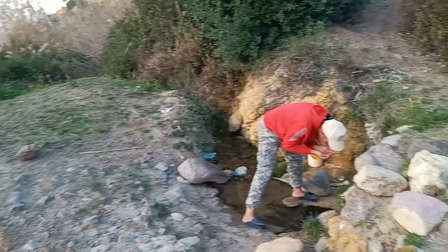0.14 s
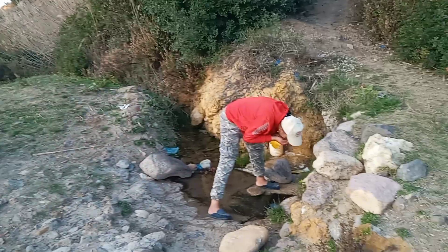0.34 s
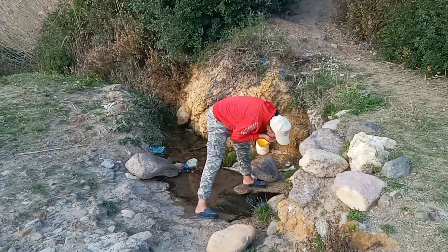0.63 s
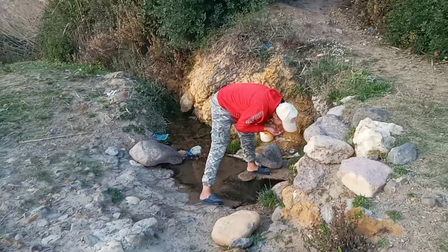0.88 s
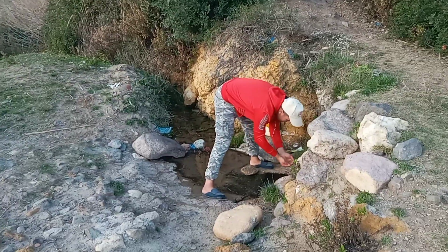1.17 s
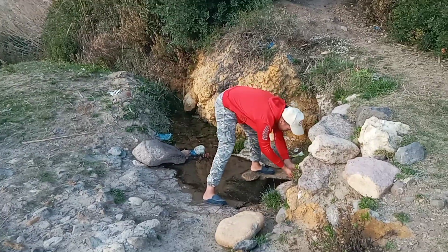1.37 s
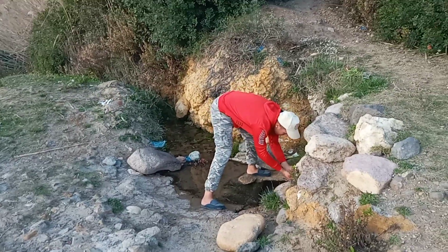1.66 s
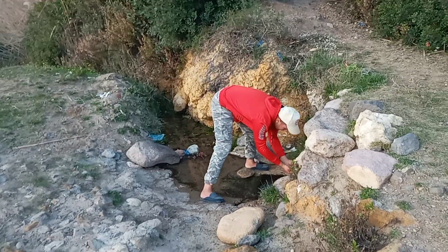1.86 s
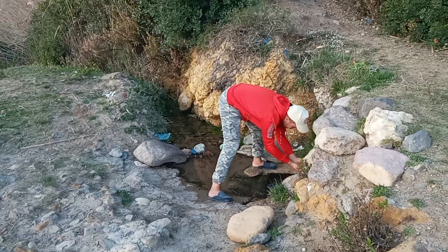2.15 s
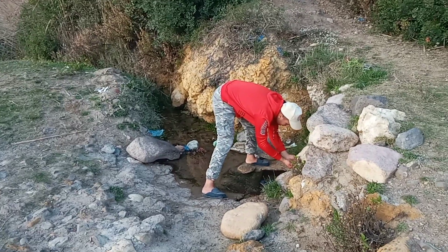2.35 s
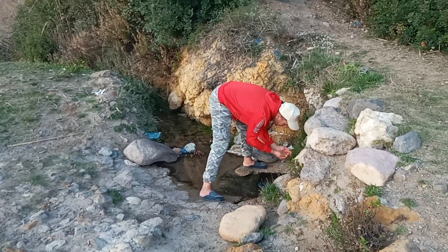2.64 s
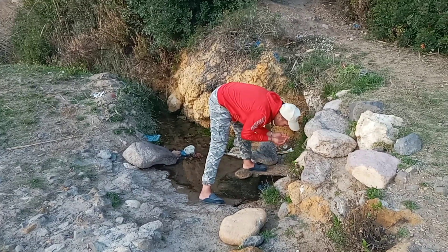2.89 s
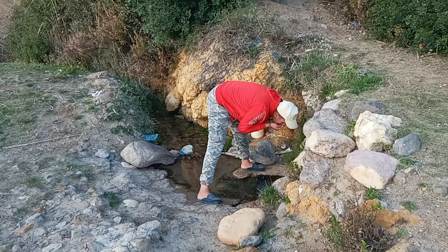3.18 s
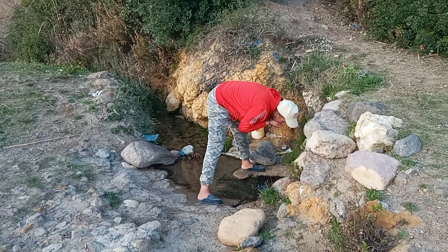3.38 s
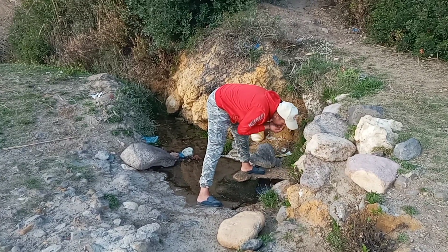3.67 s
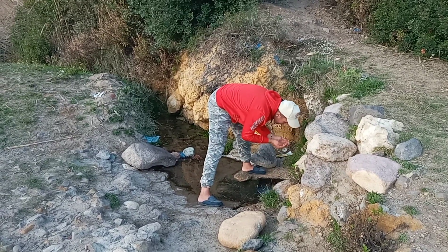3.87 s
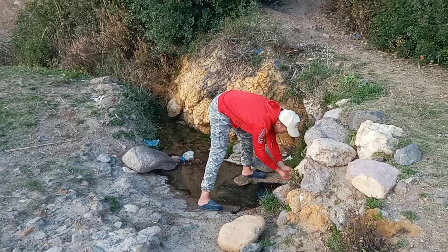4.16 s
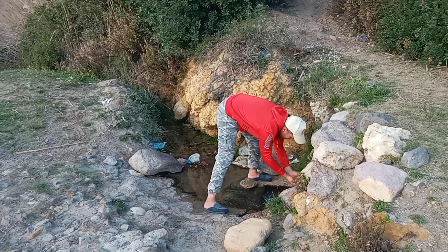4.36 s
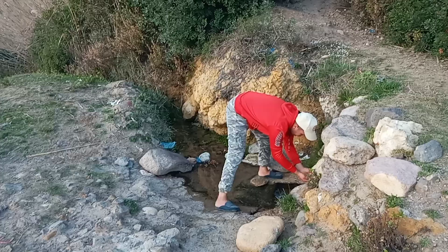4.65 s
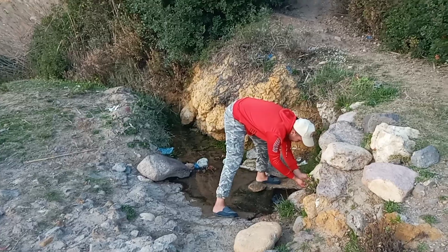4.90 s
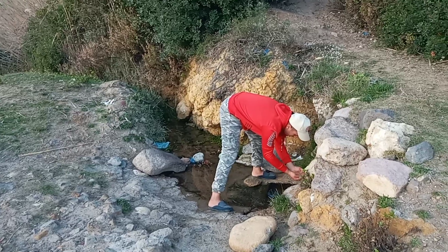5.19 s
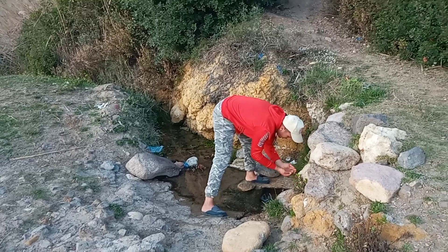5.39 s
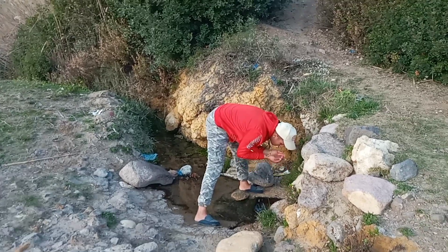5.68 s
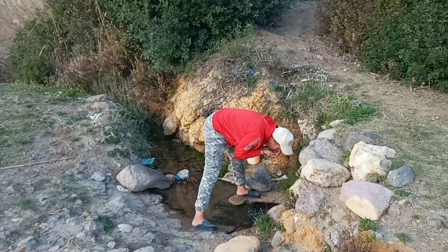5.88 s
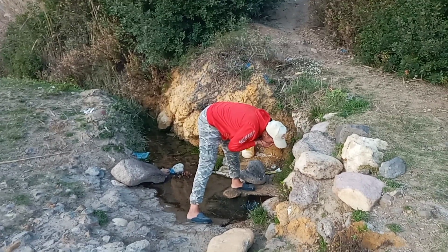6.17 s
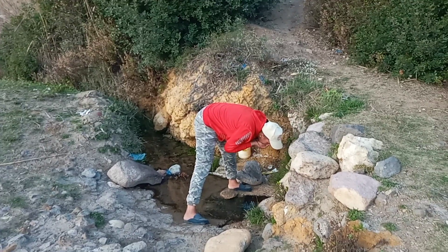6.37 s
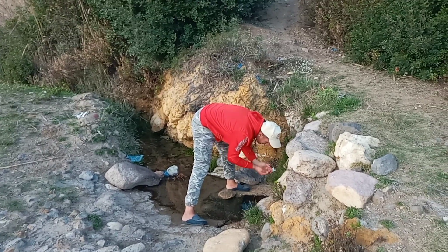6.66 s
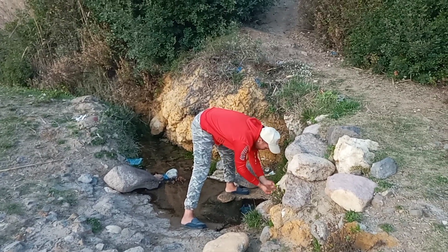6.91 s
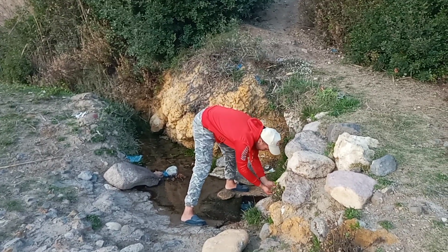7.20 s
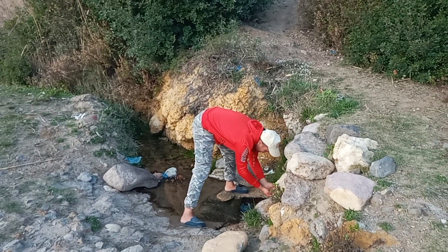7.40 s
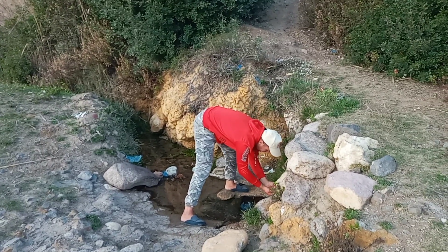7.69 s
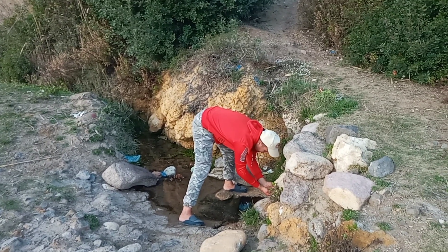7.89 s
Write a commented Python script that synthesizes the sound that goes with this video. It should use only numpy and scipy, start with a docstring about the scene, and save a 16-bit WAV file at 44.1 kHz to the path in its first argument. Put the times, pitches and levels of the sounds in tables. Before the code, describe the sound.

Someone scoops water by hand from a small spring pool among rocks. A fine trickle swells and thins with each handful, dotted with crisp drops, tiny bubble plinks and short gurgles. A sudden gulping plunge comes early, then water pours back in the middle and later. The microphone is close, with dull bumps mostly on the right, in still outdoor air.

```python
"""A small spring pool in a rocky hollow: someone scoops water and lets it run back through the hands.
Drops smack as short bursts of banded noise; bubbles ring as decaying sines, alone, in runs and in swarms.
The swarms make a fine trickle that swells with each handful; plunges and sheets are shaped noise.
Fingers bump and brush the hand-held microphone as damped swings and soft noise; the air is very still."""
import sys
import numpy as np
from scipy import signal
from scipy.fft import rfft, irfft
from scipy.io import wavfile
from scipy.ndimage import uniform_filter1d

SR = 44100
rng = np.random.default_rng(int(sys.argv[2]) if len(sys.argv) > 2 else 0)


def store_pcm(level_fs):
    """Save levels as 16-bit WAV."""
    pcm = np.round(np.clip(level_fs, -1, 1) * 32767).astype(np.int16)
    wavfile.write(sys.argv[1], SR, np.atleast_2d(pcm).T)


N = 354563
TIME = np.arange(N) / SR
CUTOFF_HZ = 15900  # top of the audible band here


def from_db(db):
    """Decibels to amplitude gain."""
    return 10 ** (np.asarray(db) / 20)


def rms_one(x):
    """Scale to unit power."""
    return x / np.sqrt(np.mean(x ** 2) + 1e-20)


def add(track, s, sound):
    """Mix a short sound in at time s."""
    at = max(int(s * SR), 0)
    track[at:at + len(sound)] += sound[:max(N - at, 0)]


def band(x, low_hz, high_hz, order=2):
    """Butterworth band-pass, kept at least a little wide and below the Nyquist limit."""
    high_hz = min(max(high_hz, 1.1 * low_hz), .45 * SR)
    return signal.sosfilt(signal.butter(order, [low_hz, high_hz], "band", fs=SR, output="sos"), x)


def colour(x, points, size=2048):
    """Causal (minimum-phase) filter through (f/Hz, level/dB) points."""
    hz, db = np.transpose(points)
    grid = np.maximum(np.fft.rfftfreq(size, 1 / SR), 1)
    curve_db = np.interp(np.log(grid), np.log(hz), db)
    cepstrum = irfft(np.log(from_db(curve_db)))
    # folding the cepstrum forward gives minimum phase
    cepstrum[1:size // 2] *= 2
    cepstrum[size // 2 + 1:] = 0
    return signal.oaconvolve(x, irfft(np.exp(rfft(cepstrum))))[:N]


def swells(rows, rise_s, fall_s):
    """Gain of overlapping (start, length, level) gestures: each rises, holds and dies away."""
    power = 0
    for s, length, db in rows:
        rise = np.clip((TIME - s) / rise_s, 0, 1)
        fall = np.exp(-np.clip((TIME - s - length) / fall_s, 0, 20))
        power = power + (from_db(db) * rise * fall) ** 2
    return np.sqrt(power)


# the loudest drops: t/s, relative level/dB, centre f/Hz, width/octaves, decay/ms (0.2 at least),
# snap level/dB against the body
SPLASHES = [(0.283, -43, 8000, 0.17, 1.9, -30), (0.59, -38.5, 7100, 0.43, 0.11, -19),
            (0.913, -46.5, 1450, 0.67, 3.1, -23), (0.915, -50.5, 440, 1.1, 2.4, -30),
            (1.043, -39, 5100, 0.69, 3.1, -24), (1.151, -31, 6350, 0.29, 0.56, -13),
            (1.215, -45.5, 5600, 0.86, 4.4, -22), (1.584, -47.5, 2600, 0.23, 7.1, -11),
            (2.226, -46, 5900, 0.14, 1.3, -17), (2.342, -45.5, 7530, 0.24, 3.1, -26),
            (2.355, -42, 6600, 0.27, 1.7, -31), (2.515, -33, 3640, 0.15, 1.9, -39),
            (2.58, -34.5, 3740, 0.83, 2, -14.5), (2.652, -38.5, 6850, 0.27, 2.3, -29),
            (2.704, -47.5, 3600, 0.18, 2.9, -14), (2.782, -40, 6920, 0.24, 2, -25),
            (3.059, -42, 2470, 0.91, 6.1, -31), (3.159, -38.5, 7140, 0.23, 2.1, -29),
            (3.475, -38.5, 6530, 0.4, 1.1, -27), (3.637, -47, 2800, 2.3, 4.7, -32),
            (3.729, -38, 5450, 0.53, 0.76, -37), (3.754, -45, 5100, 0.53, 3.1, -24),
            (3.784, -40.5, 5740, 0.52, 2.2, -41), (4.129, -40, 2870, 1.1, 4.3, -46),
            (4.2261, -43, 4300, 2.7, 0.9, -16), (4.382, -45.5, 7430, 0.14, 4.1, -43),
            (4.792, -48.5, 557, 4.2, 0.86, -20), (5.028, -40, 4250, 0.42, 3.4, -31),
            (5.123, -45, 3760, 0.11, 2.8, -29), (5.27, -38, 4750, 0.82, 4.3, -23),
            (5.324, -40, 5060, 0.52, 4.3, -25), (5.419, -43, 3900, 0.93, 9.7, -20),
            (5.477, -45, 3700, .9, 9.7, -26), (5.549, -48, 5300, 0.33, 2.9, -11.5),
            (5.683, -37.5, 2540, 0.12, 0.9, -7), (5.7043, -28, 5650, 0.93, 0.62, -18),
            (5.721, -42.5, 5430, 1.5, 3.1, -3), (5.79, -41.5, 3970, .3, 1.6, -22),
            (5.933, -38, 7100, 0.47, 1, -29), (6.018, -43, 6040, 0.57, 2.2, -37),
            (6.062, -36, 6600, 0.41, 1.3, -14), (6.21, -42.5, 6370, 0.35, 6.9, -35),
            (6.334, -42, 7150, 0.1, 13, -32), (6.358, -44.5, 3600, 0.96, 7.5, -30),
            (6.367, -38, 7200, 0.24, 0.26, -15), (6.437, -42, 6850, 0.093, 5.4, -38),
            (6.472, -40.5, 6850, 0.18, 1.3, -21), (6.778, -46, 7430, 0.27, 3.6, -20),
            (6.869, -42, 3580, 0.12, 5.4, -39), (7.029, -49, 4040, 1, 7.1, -27),
            (7.863, -34.5, 5300, 0.72, 2.6, -31), (7.948, -47, 1930, 1.5, 10.6, -28)]


def splashes(level_db, spatter_db, spatter_s, softness, sloppy_db):
    """Each drop cracks, slower slops more softly; droplets spatter, sloppy_db more per doubled decay."""
    out, t = np.zeros(N), TIME[:SR // 10]
    for s, db, hz, octaves, decay_ms, snap_db in SPLASHES:
        noise, grains, sizes = rng.standard_normal((3, len(t)))
        decay = max(decay_ms, .2) / 1000
        attack = softness * decay
        low_hz, high_hz = hz / 2 ** (octaves / 2), hz * 2 ** (octaves / 2)
        onset = np.minimum(t / attack, 1) ** 2
        crack = noise * onset * np.exp(-np.maximum(t - attack, 0) / decay)
        spatter = grains * from_db(0.47 * sizes) * onset * np.exp(-t / spatter_s)
        thrown = from_db(spatter_db + sloppy_db * np.log2(decay / spatter_s))
        body = rms_one(band(crack, low_hz, high_hz))
        body = body + thrown * rms_one(band(spatter, low_hz / 1.09, high_hz * 0.85))
        # a flat impact adds a wide-band snap
        snap = from_db(snap_db) * rms_one(band(crack + spatter / 10, 3100, CUTOFF_HZ))
        add(out, s - attack / 2, from_db(db + level_db) * (body + snap))
    return out


def bubble(hz, t60, rise):
    """A trapped bubble rings down; positive rise is the fraction it climbs as it nears the surface."""
    t = TIME[:int(t60 * SR) + 2]
    tone = np.sin(2 * np.pi * hz * (t + rise * t * t / (2 * t60)))
    return tone * from_db(-60 * t / t60) * (1 - np.exp(-t * hz))


# the loudest single bubbles: t/s, f/Hz, relative level/dB
BUBBLES = [(0.062, 1144, -58), (0.069, 3770, -60), (0.267, 2820, -61.5), (0.46, 2833, -58),
           (0.784, 2480, -63), (1.605, 2780, -62), (2.49, 1390, -58.5), (2.514, 6880, -54),
           (2.895, 6970, -68), (3.003, 7080, -61), (3.121, 1463, -59.5), (3.2, 1560, -55),
           (3.326, 4290, -59), (3.408, 3480, -57), (3.412, 6000, -52), (3.494, 2000, -54.5),
           (3.545, 3730, -62.5), (3.716, 7720, -52.5), (3.82, 7360, -57.5), (4.044, 7280, -61),
           (4.131, 2530, -58.5), (4.809, 430, -57), (5.436, 2310, -54), (5.578, 530, -63),
           (5.785, 1620, -56), (6.227, 1760, -52), (6.445, 7500, -61.5), (6.541, 1360, -57),
           (6.628, 6730, -60), (6.777, 247, -52.5), (6.825, 1024, -58.5), (6.836, 7400, -61.5),
           (6.952, 1800, -55.5), (6.96, 610, -62), (7.042, 650, -60), (7.057, 137, -49.5),
           (7.187, 1450, -61), (7.195, 2250, -63), (7.955, 1214, -53.5)]


def bubbles(level_db, t60, rise, trail_s, detune, trail_db, count=5):
    """A plink, then a trail of weaker bubbles of about its size that break off it."""
    out = np.zeros(N)
    for s, hz, db in BUBBLES:
        gain = from_db(db + level_db)
        add(out, s, gain * bubble(hz, t60, rise))
        for late, off in rng.random((count, 2)):
            weaker = gain * from_db(trail_db) * (1 - late / 2)
            near_hz = hz * (1 + detune * (2 * off - 1))
            add(out, s + trail_s * late, weaker * bubble(near_hz, t60, rise))
    return out


# air churned under the surface escapes in runs of bubbles: t/s, length/s, middle f/Hz, relative level/dB
GURGLES = [(1.03, 0.13, 1190, -58.5), (2.757, 0.086, 1474, -57.5), (3.504, 0.05, 1660, -65),
           (3.6, 0.06, 890, -60), (3.662, 0.06, 1730, -59), (6.205, 0.061, 953, -58),
           (6.797, 0.11, 1514, -59.5), (7.923, 0.044, 1490, -56.5)]


def gurgles(level_db, spread_octaves, t60, rise, count=16):
    """Overlapping bubbles crowd around one pitch, strongest in the middle of the run."""
    out = np.zeros(N)
    for s, length, hz, db in GURGLES:
        run = np.zeros(int((length + 2 * t60) * SR))
        for when, off in zip(rng.random(count), rng.standard_normal(count)):
            near_hz = hz * 2 ** (spread_octaves * off)
            add(run, when * length, np.sin(np.pi * when) * bubble(near_hz, t60, rise))
        add(out, s, from_db(db + level_db) * rms_one(pockets(run)))
    return out


# air squeezed through the water gurgles in thin glides:
# t/s, length/s, first f/Hz, last f/Hz, relative level/dB
CHIRPS = [(2.032, 0.041, 1326, 1820, -52), (2.057, 0.067, 3387, 3630, -56.5),
          (4.455, 0.052, 976, 720, -57.5), (5.837, 0.083, 6540, 7500, -51.5),
          (6.086, 0.11, 4950, 4720, -59), (6.134, 0.023, 3980, 3090, -54.5),
          (6.136, 0.026, 7130, 7430, -51), (6.199, 0.0274, 3990, 3250, -49.5),
          (6.652, 0.023, 3300, 3800, -53), (7.802, 0.031, 840, 1010, -52), (7.858, 0.048, 1044, 1134, -57)]


def chirps(level_db, waver):
    """Short gliding whistles, their pitch slightly unsteady."""
    out = np.zeros(N)
    for s, length, first_hz, last_hz, db in CHIRPS:
        n = int(length * SR)
        unsteady = rms_one(uniform_filter1d(rng.standard_normal(SR // 4), size=100))[:n]
        hz = np.linspace(first_hz, last_hz, n) * (1 + waver * unsteady)
        swell = np.sin(np.linspace(0, np.pi, n))
        whistle = np.sin(2 * np.pi * np.cumsum(hz) / SR)
        add(out, s, from_db(db + level_db) * swell * whistle)
    return out


# bubble sizes in running water, coarse to fine:
# lowest f/Hz, highest f/Hz, drops per second, cycles of ringing, trim level/dB
SIZES = [(218.7, 966, 90, 17, -10), (913, 4240, 760, 68, 2), (4410, 13000, 650, 120, 5.5)]
# colour of running water among the rocks: f/Hz, level/dB
WATER = [(170, 7), (270, 0), (400, -7.5), (620, -17.5), (780, -15), (1100, -4.5), (1500, 2), (2900, 0),
         (3700, 3.5), (4400, -5), (7600, 4), (9500, -19), (13000, -36.5), (15300, -5)]
GRAIN_SPREAD_DB, WASH_DB = 5.4, -11.5  # spread of drop strengths, wash against the bubbles


def running_water(rise, even_s, cluster_s, detune, count=4):
    """Each drop traps a cluster of like-sized bubbles; clusters and a soft wash swell with the flow."""
    out = 0
    for fineness, (low_hz, high_hz, per_s, cycles, trim_db) in enumerate(SIZES, -1):
        swarm = np.zeros(N)
        for when, size, strength, *members in rng.random((int(per_s * N / SR), 3 + 2 * count)):
            centre_hz = low_hz + (high_hz - low_hz) * size
            gain = from_db(GRAIN_SPREAD_DB * min(-np.log(1 - strength), 3.5)) * np.sqrt(centre_hz)
            for late, off in zip(members[:count], members[count:]):
                hz = centre_hz * (1 + detune * (2 * off - 1))
                # early members climb in pitch, the latest sink
                ring = bubble(hz, cycles / hz, rise * (1 - 2 * late ** 2))
                add(swarm, when * N / SR + cluster_s * late ** 2, gain * (1 - late / 2) * ring)
        wash = rms_one(band(rng.standard_normal(N), low_hz, high_hz, order=4))
        water = pockets(rms_one(swarm) + from_db(WASH_DB) * wash)
        water = hollow(colour(water, WATER), wet_db=-1, t60=0.12)
        # level out the chance swells, so that the flow sets the loudness
        power = uniform_filter1d(np.mean(water ** 2, axis=0), int(even_s * SR))
        water /= np.sqrt(power + 1e-12)
        # the finer the water, the more of it arrives in spurts
        share = (fineness + 2) / 4
        bursts = 1 - share + share * spurts()
        out = out + water * bursts * flow(fineness) * from_db(trim_db)
    return out


# water running off the hands, rising with each lifted handful: t/s, relative level/dB
RUNOFF = [(0, -61), (0.35, -66.5), (0.85, -61.5), (1.25, -57), (1.5, -68), (2.0, -74.5), (2.5, -64.5),
          (3.1, -62.5), (3.7, -55), (4.15, -63.5), (4.65, -71.5), (5.2, -69), (5.6, -61.5), (5.9, -58),
          (6.85, -76.5), (7.2, -95), (7.7, -71.5), (8.04, -60.5)]
# the hands stir or spill water: t/s, length/s, relative level/dB,
# brightness/dB from each bubble size to the next finer
SLOSHES = [(0.527, 0.25, -68.5, -11), (0.94, 0.23, -62, -7.5), (1.557, 0.053, -55.5, -2.5),
           (2.021, 0.21, -64.5, -12.5), (2.373, 0.037, -62.5, 3.5), (2.478, 0.16, -53.5, 1.5),
           (3.447, 0.03, -55.5, 6), (3.685, 0.033, -53, -2.5), (5.251, 0.28, -56, -0.5),
           (5.531, 0.038, -62.5, -16.5), (5.723, 0.13, -52.5, -4.5), (5.823, 0.404, -59.5, 5),
           (6.185, 0.091, -65, -14.5), (6.323, 0.22, -61, 2.5), (6.54, 0.19, -61.5, -7),
           (6.737, 0.17, -60, -7.5), (7.91, 0.035, -59, -14)]


def flow(fineness):
    """Gain of one bubble size (-1 gurgle, 0 trickle, 1 spray): runoff and sloshes added in power."""
    rows = [(s, length, db + bright * fineness) for s, length, db, bright in SLOSHES]
    sloshes = swells(rows, rise_s=0.01, fall_s=0.036)
    runoff = from_db(np.interp(TIME, *np.transpose(RUNOFF)))
    return np.hypot(runoff, sloshes)


SPURTS_PER_S, SPURT_DECAY_S = 40, .014


def spurts():
    """Gain of water that arrives in random bursts: each starts quickly and dies away."""
    starts = (rng.random(N) < SPURTS_PER_S / SR) * rng.exponential(1, N)
    starts = np.convolve(starts, np.hanning(SR // 100), "same")  # 10 ms soft edges
    power = signal.lfilter([1], [1, -np.exp(-2 / (SPURT_DECAY_S * SR))], starts + 1e-18)
    return rms_one(np.sqrt(power))


# air pockets between the wet rocks ring at these pitches: f/Hz
POCKETS = [590, 1030, 1430, 1770, 2280, 2820, 3600, 4280, 5250, 6700]
POCKET_WIDTH_HZ, POCKET_DB = 75, 3


def pockets(x):
    """The air pockets ring on behind the water, each a narrow resonance at its own pitch."""
    ringing = sum(signal.lfilter(*signal.iirpeak(hz, hz / POCKET_WIDTH_HZ, fs=SR), x) for hz in POCKETS)
    return x + from_db(POCKET_DB) * ringing


# the hands plunge into the pool in a few gulps: t/s, level/dB, decay/s
PLUNGE = [(1.327, -37.5, 0.019), (1.357, -34, 0.0067), (1.367, -34, 0.005), (1.3761, -22, 0.0031),
          (1.384, -34.5, 0.022)]
# colour of the air they push under: f/Hz, level/dB
PLUNGE_COLOUR = [(60, -20), (170, 15.5), (520, 7.5), (1080, 16.5), (1450, 5), (1900, 13.5), (2500, -10),
                 (6000, -6), (15500, -31)]


def plunge(attack_s):
    """Each gulp of pushed-under air is coloured noise that starts sharply and dies away."""
    power = 0
    for s, db, decay in PLUNGE:
        attack = np.clip((TIME - s) / attack_s, 0, 1)
        fall = np.exp(-np.clip((TIME - s - attack_s) / decay, 0, 20))
        power = power + (from_db(db) * attack * fall) ** 2
    return rms_one(colour(rng.standard_normal(N), PLUNGE_COLOUR)) * np.sqrt(power)


# water slides off the palms in a smooth sheet: t/s, length/s, level/dB
SHEETS = [(0.95, 0.24, -57), (4.25, 0.16, -57), (4.79, 0.04, -55.5), (4.87, 0.1, -56.5)]
# colour of its hiss: f/Hz, level/dB
SHEET_COLOUR = [(300, -6.5), (1900, -5), (2500, -3.5), (3300, -5.5), (4800, -6.5), (5500, 4), (6300, -1),
                (7500, 7.5), (8400, -16), (11000, -24.5)]


def sheets(rise_s, fall_s):
    """An unbroken film of water hisses as smooth coloured noise, without separate drops."""
    return rms_one(colour(rng.standard_normal(N), SHEET_COLOUR)) * swells(SHEETS, rise_s, fall_s)


# a handful pours back into the pool: t/s, length/s, relative level/dB
POURS = [(3.05, 0.87, -63.5), (5.9, 0.5, -53), (6.55, 0.34, -56)]


def burble(hz, width_hz, level_db):
    """Water falling from the hands drives an air pocket that murmurs in fits at one low pitch."""
    drive = band(rng.standard_normal(N), hz / 2, 2 * hz)
    pocket = signal.lfilter(*signal.iirpeak(hz, hz / width_hz, fs=SR), drive)
    pouring = swells(POURS, rise_s=0.22, fall_s=0.017)
    return rms_one(pocket) * spurts() * pouring * from_db(level_db)


# fingers bumping the casing by the right port: t/s, relative level/dB, hardness/dB per octave,
# pitch as a ratio to the casing's own, cycles to the widest swing
BUMPS = [(0.024, -26, -12.5, 0.91, 0.62), (0.0336, -33, 40, 1.9, 0.88), (0.0345, -15, 6, 0.99, 0.84),
         (1.6977, -20, 24.5, 1.026, 1.3), (1.6994, -32, -5, 1.33, 1.55), (1.7036, -29.5, 14.5, 0.85, 0.68),
         (2.229, -30, -7.5, 0.79, 0.66), (2.668, -39, -0.5, 0.84, 0.38), (3.76, -40.5, -7.5, 1.23, 2.4),
         (3.793, -38, -14, 1.22, 0.87), (3.879, -36.5, -8.5, 1.26, 1.2), (3.897, -34.5, -8.5, 1.03, 0.74),
         (3.964, -29.5, -41, 1.23, 0.74), (3.964, -19.5, 20, 1.01, 1), (3.968, -14, 2.5, 0.94, 0.63),
         (4.388, -43.5, -9, 0.86, 0.57), (4.516, -35.5, -11, 0.99, 0.75), (4.535, -33, 1.5, 1.17, 1.75),
         (6.098, -38.5, 7.5, 1.04, 1.2), (6.196, -33, 28, 0.93, 1.2), (7.1245, -33, 40, 0.95, 0.91),
         (7.641, -29, -6, 1, 0.5), (7.7325, -35.5, 34, 1.14, 1.25), (7.775, -21.5, 35, 1.04, 1.06),
         (7.7824, -7.5, 27, 1, 0.78), (7.789, -31, 4, 1.32, 0.76)]
# how the casing swings when touched, the low swings last: f/Hz, relative level/dB, lag/s
CASING = [(1540, -10.5, 0.00083), (676, 6, 0.00016), (273, 8.5, 0.00287), (112, -13.5, 0.008)]


def swings():
    """A bump sets all the casing's swings going, a hard one the high ones more: (s, dB, Hz, cycles)."""
    hz, mode_db, lag = np.transpose(CASING)
    rows = []
    for s, db, hardness, pitch, cycles in BUMPS:
        share_db = mode_db + hardness * np.log2(hz)
        share_db = share_db - share_db.max()  # the strongest swing takes the bump's level
        rows += zip(s + lag, db + share_db, pitch * hz, np.full(len(hz), cycles))
    return rows


def bumps(level_db, slip_db, slip_in_s, slip_out_s):
    """A soft fingertip slips a little as it lands, then pushes the casing through a swing or two."""
    out, t = np.zeros(N), TIME[:SR // 10]
    since = t - t.mean()
    sliding = np.exp(np.minimum(since / slip_in_s, -since / slip_out_s))
    for s, db, hz, swell_cycles in swings():
        cycles = t * hz
        swell = (cycles / swell_cycles * np.exp(1 - cycles / swell_cycles)) ** 3
        swing = swell * np.cos(2 * np.pi * (cycles - swell_cycles))
        add(out, s - swell_cycles / hz, from_db(db + level_db) * swing)
        slip = rms_one(band(rng.standard_normal(len(t)), hz / 2, 1900, order=3)) * sliding
        add(out, s - t.mean(), from_db(db + slip_db) * slip)
    return colour(out, [(30, -20.0), (90, 2.0), (2400, -4.5), (3400, 5.0), (4500, -18), (9000, -42.0)])


# a finger brushes past the right port: t/s, length/s, level/dB
RUBS = [(3.934, 0.025, -43.5), (7.722, 0.056, -60)]
# colour of the rubbing: f/Hz, level/dB
BRUSH_COLOUR = [(50, -2), (170, 20.5), (500, 7.5), (1200, 9), (2100, 7), (3000, -3), (15500, -44)]


def brush(rise_s, fall_s):
    """Skin rubs briefly over the casing: coloured noise in short swells."""
    return rms_one(colour(rng.standard_normal(N), BRUSH_COLOUR)) * swells(RUBS, rise_s, fall_s)


def hollow(x, wet_db, t60):
    """Direct sound plus a short decaying scatter from the rocks, different at each port."""
    t = TIME[:SR // 2]
    scatter = rng.standard_normal((2, len(t))) * from_db(-60 * t / t60)
    scatter *= from_db(wet_db) / np.sqrt(np.sum(scatter ** 2, axis=1, keepdims=True))
    return x + np.array([signal.oaconvolve(x, echoes)[:N] for echoes in scatter])


# still air and hiss: f/Hz, left relative level/dB per Hz, right relative level/dB per Hz
AIR = [(37.4, -105, -104), (102.7, -93.5, -102), (292, -104, -104), (860, -108, -110), (1590, -106, -113),
       (2560, -107, -112), (4900, -114, -114), (7660, -108, -121), (9300, -122, -128), (13300, -124, -126),
       (15040, -116, -118)]


def air(level_db):
    """Faint steady outdoor hush: coloured noise, independent at each port."""
    table = np.array(AIR)
    white = rng.standard_normal((2, N)) * np.sqrt(SR / 2)  # unit power per Hz
    return from_db(level_db) * np.array([colour(white[k], table[:, [0, k + 1]]) for k in range(2)])


# the right port is half covered: f/Hz, level/dB against the left
RIGHT_PORT = [(650, -2.5), (1050, -10), (1500, -10.5), (3200, -2.5), (4400, -11), (5200, -12.5),
              (7200, -28), (9500, -31.5), (15300, -1.5)]
LEFT_LAG = 37  # samples


def scene():
    """The pool lies to the right, so its sound reaches the left port a little later."""
    drops = splashes(level_db=-13, spatter_db=-3.0, spatter_s=0.011, softness=0.87, sloppy_db=4.5)
    plinks = bubbles(level_db=14.5, t60=0.038, rise=0.07, trail_s=0.023, detune=0.136, trail_db=-9)
    plinks += gurgles(level_db=-4, spread_octaves=0.333, t60=.035, rise=0.075)
    plinks += chirps(level_db=3.5, waver=0.016)
    pool = hollow(drops, wet_db=-2.5, t60=0.096)
    pool += hollow(plinks, wet_db=-1.0, t60=0.057)
    pool += from_db(-1.5) * running_water(rise=0.048, even_s=0.06, cluster_s=.012, detune=0.1)
    pool += hollow(plunge(attack_s=0.0025), wet_db=-11, t60=0.093)
    pool += hollow(sheets(rise_s=0.05, fall_s=0.031), wet_db=-1.0, t60=0.14)
    pool += burble(hz=255.4, width_hz=6.9, level_db=-8.0)
    left, right = pool
    handling = bumps(level_db=2.5, slip_db=-33.5, slip_in_s=0.015, slip_out_s=0.013)
    handling += brush(rise_s=0.0024, fall_s=0.01)
    late_left = np.pad(left, (LEFT_LAG, 0))[:N]
    ports = np.array([late_left, colour(right, RIGHT_PORT) + handling])
    return ports + air(level_db=1.0)


def record(dry):
    """The deep bass and the very top are cut."""
    dry = signal.sosfilt(signal.butter(2, 50, "high", fs=SR, output="sos"), dry)
    return signal.sosfilt(signal.ellip(10, .2, 80, CUTOFF_HZ, fs=SR, output="sos"), dry)


dry = scene()
out = record(dry)
store_pcm(out)
```